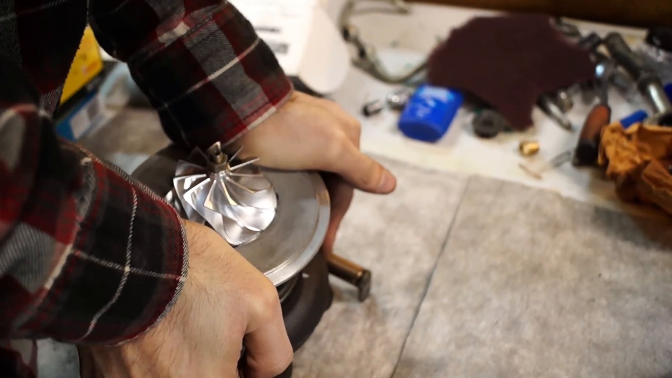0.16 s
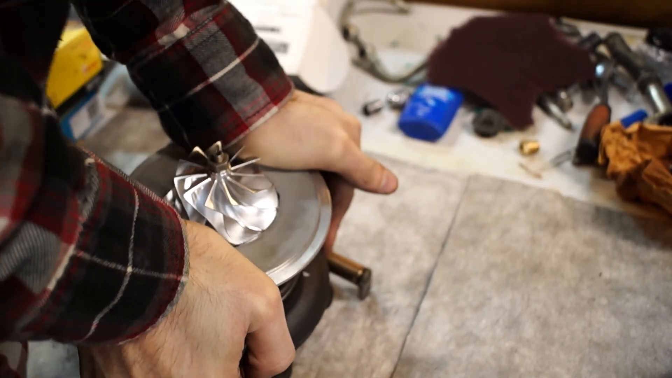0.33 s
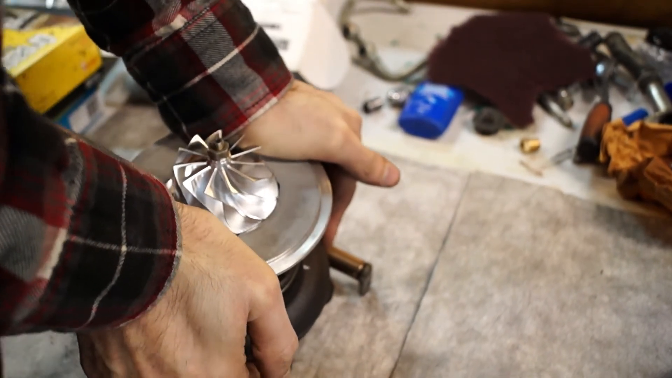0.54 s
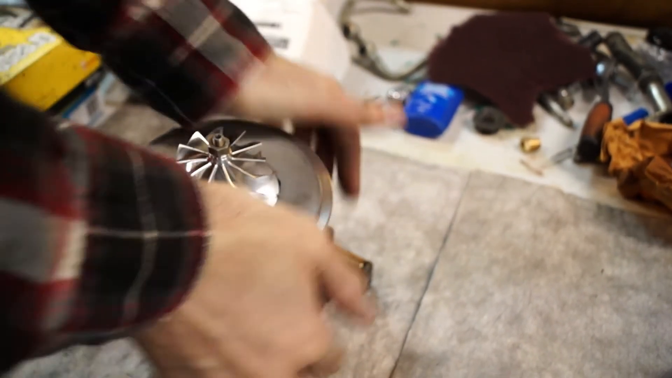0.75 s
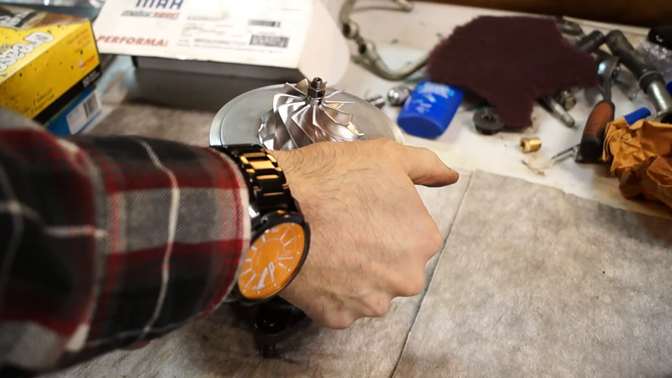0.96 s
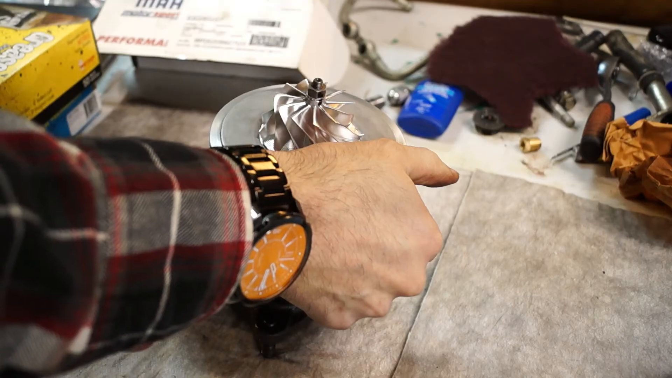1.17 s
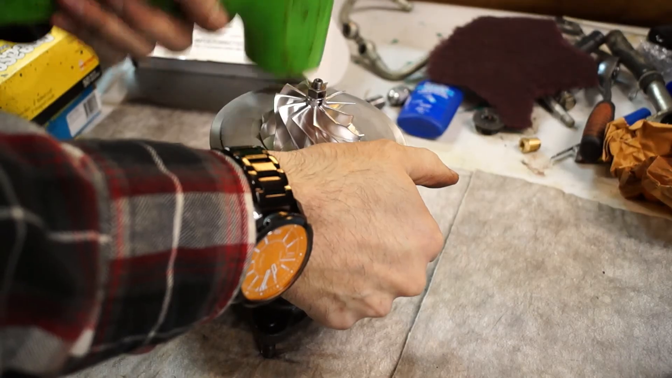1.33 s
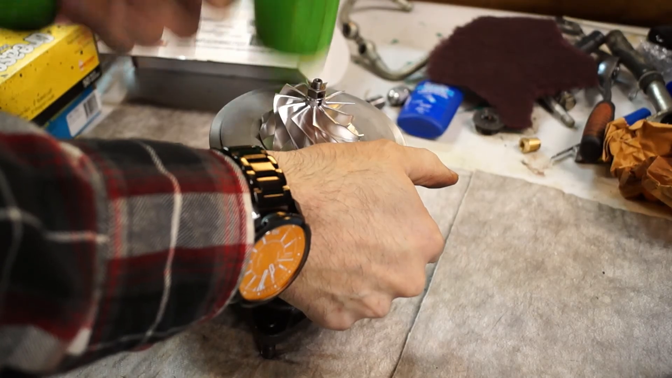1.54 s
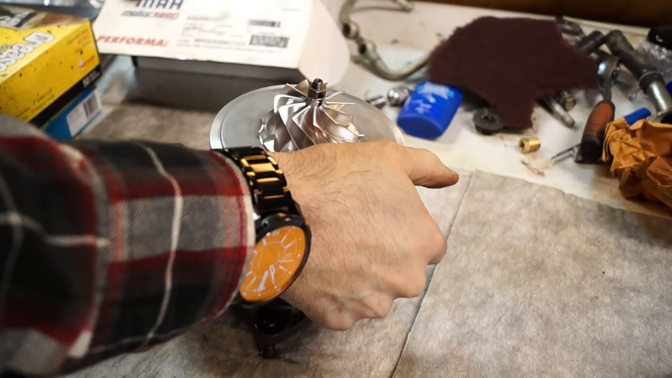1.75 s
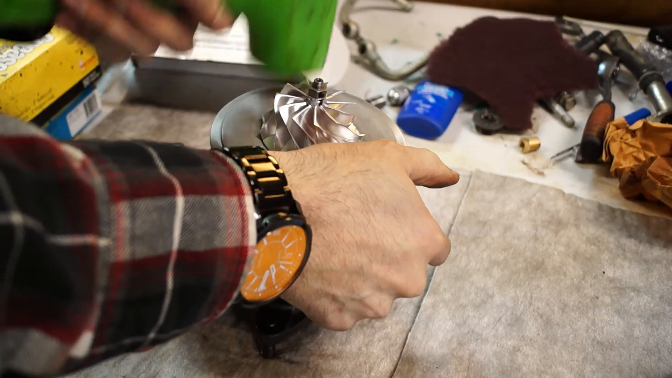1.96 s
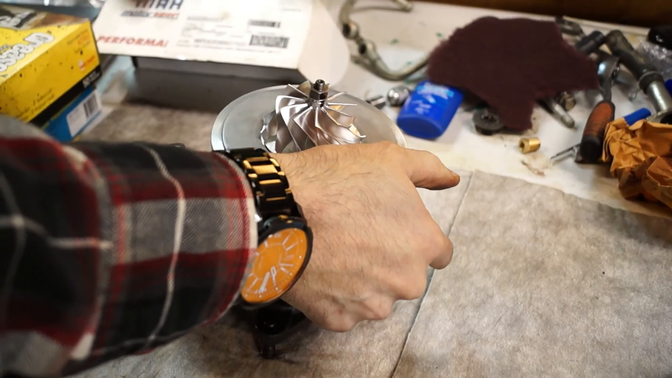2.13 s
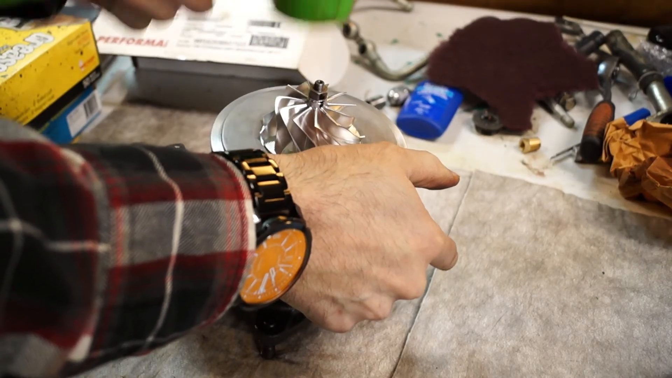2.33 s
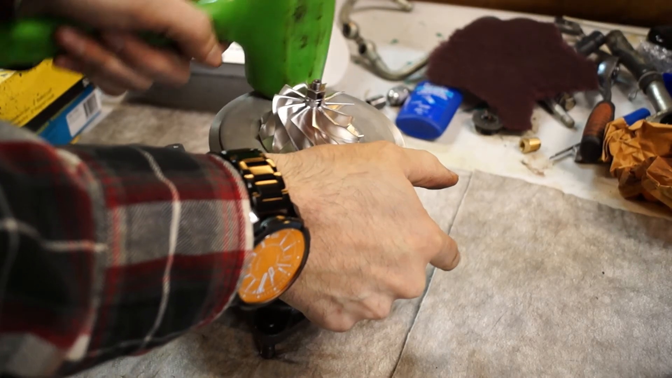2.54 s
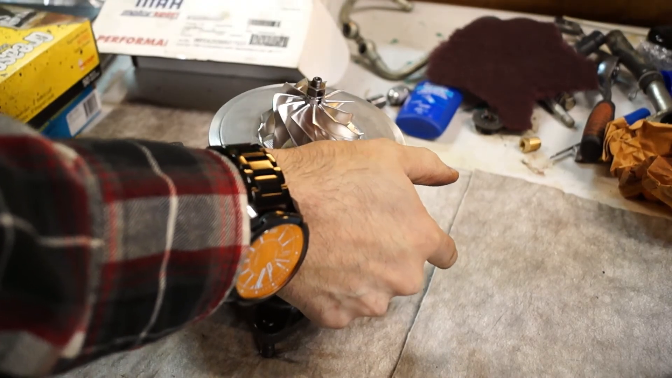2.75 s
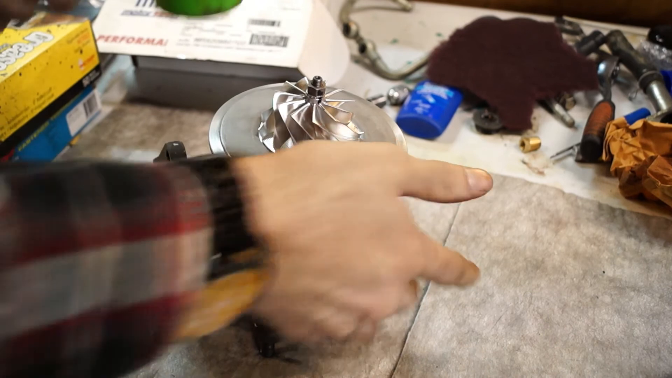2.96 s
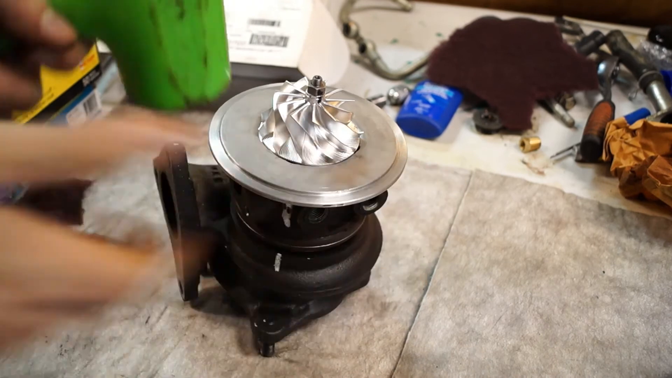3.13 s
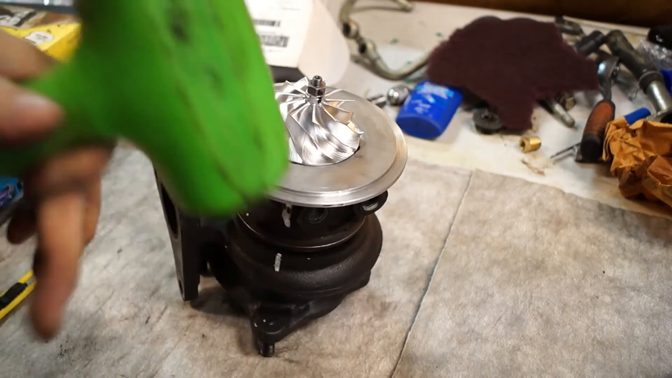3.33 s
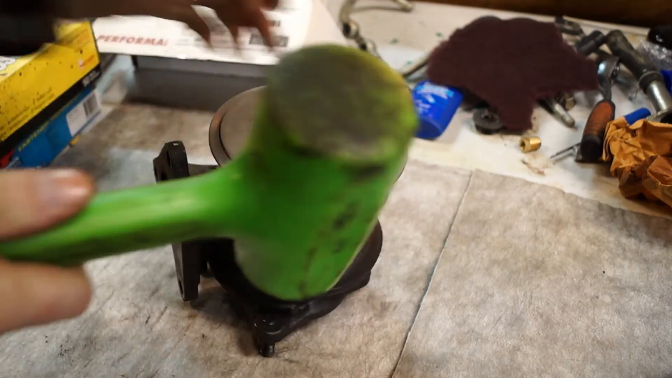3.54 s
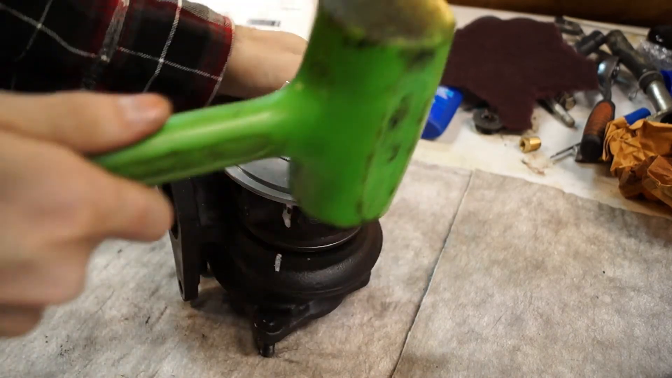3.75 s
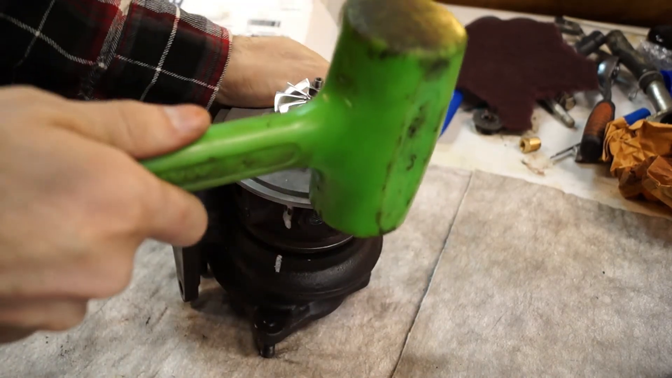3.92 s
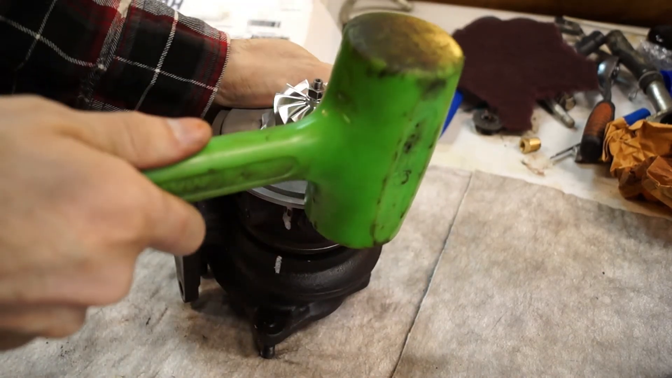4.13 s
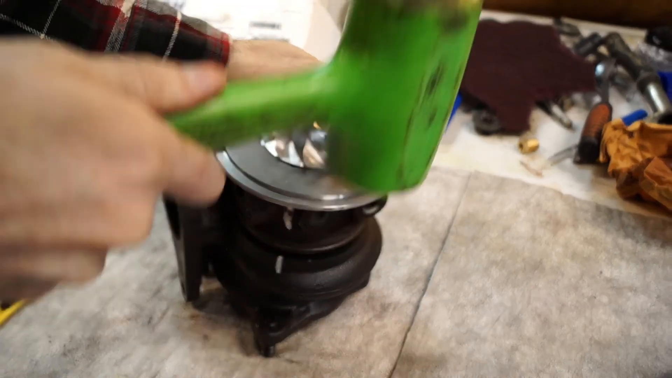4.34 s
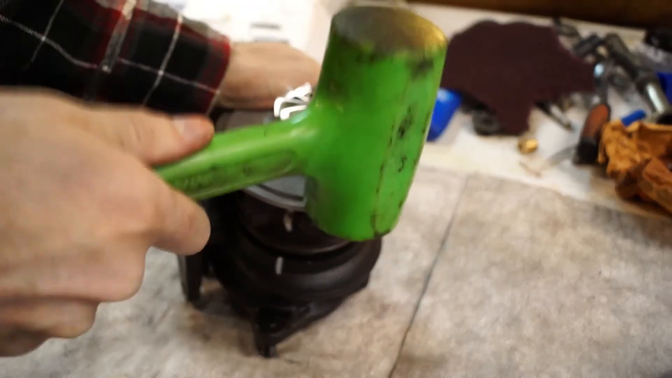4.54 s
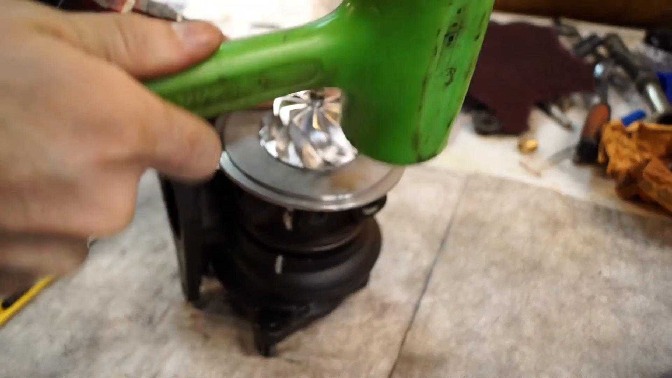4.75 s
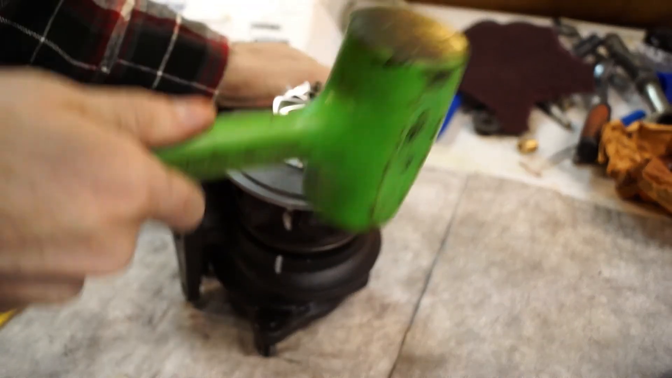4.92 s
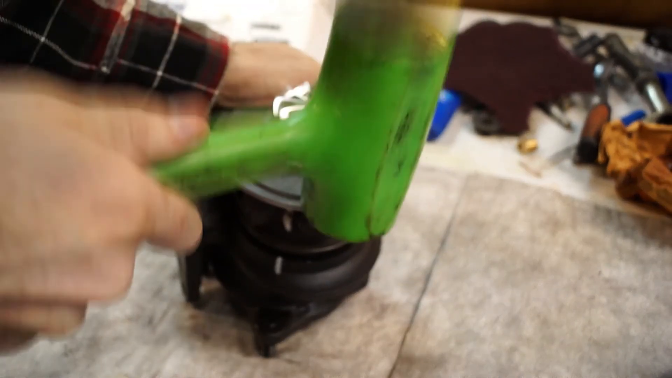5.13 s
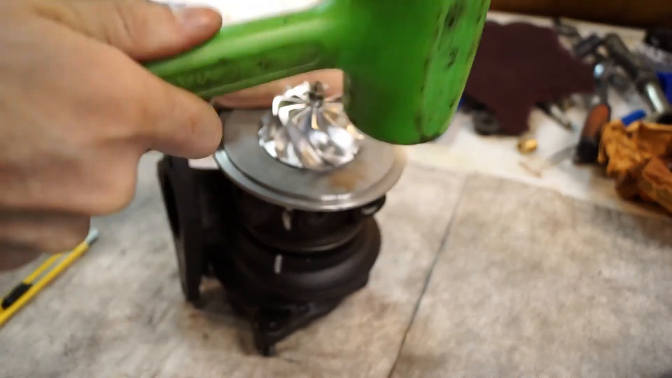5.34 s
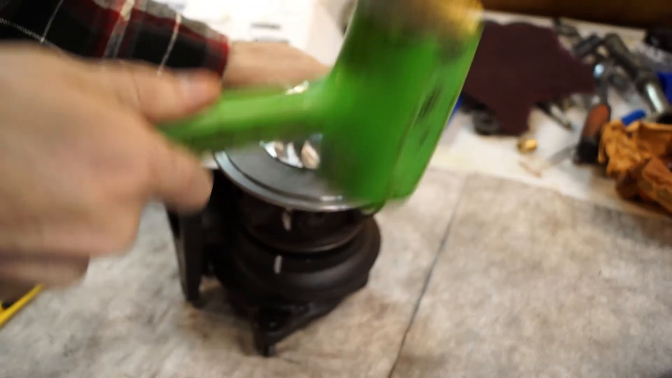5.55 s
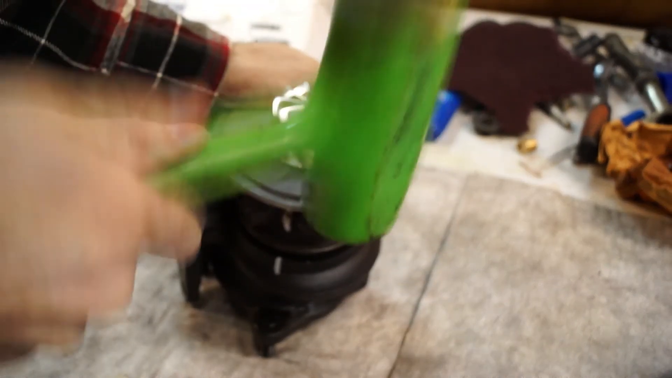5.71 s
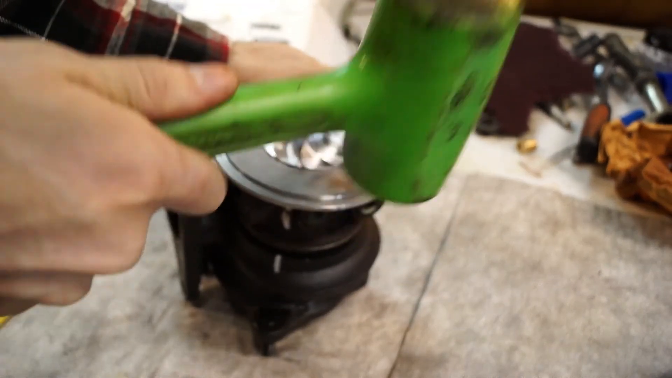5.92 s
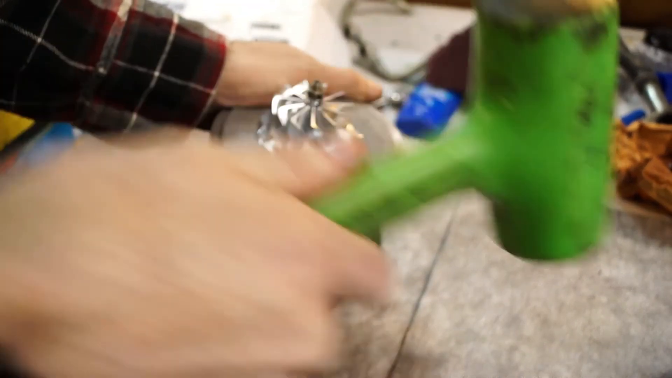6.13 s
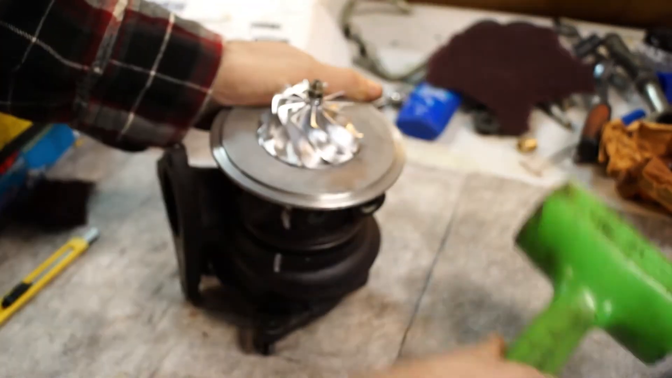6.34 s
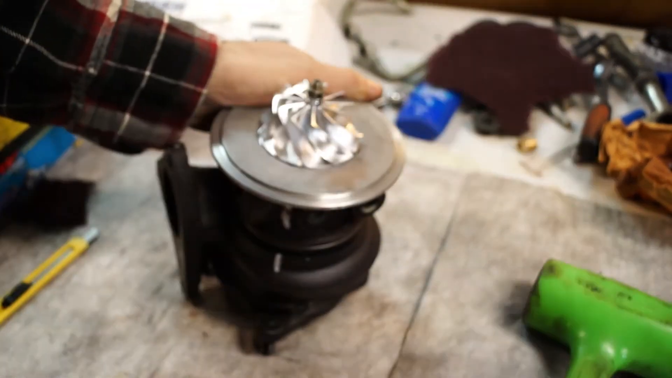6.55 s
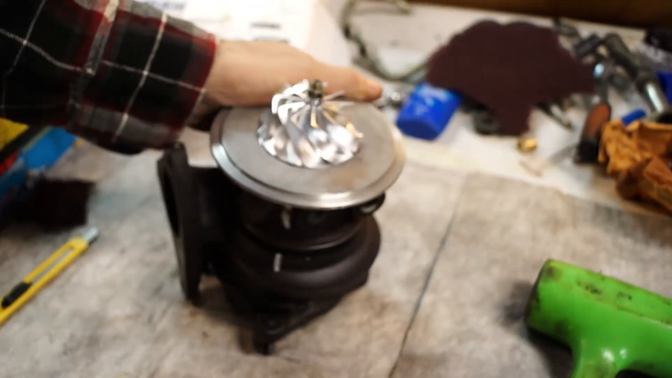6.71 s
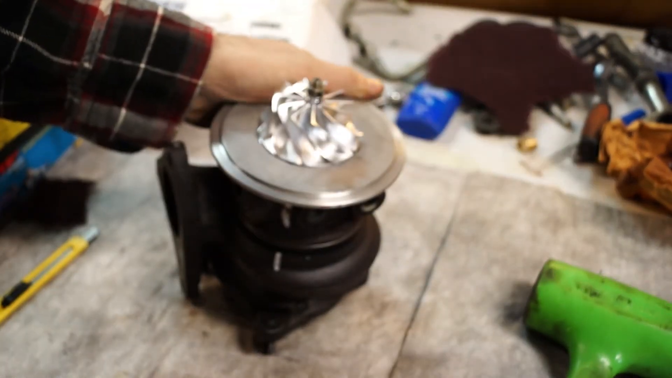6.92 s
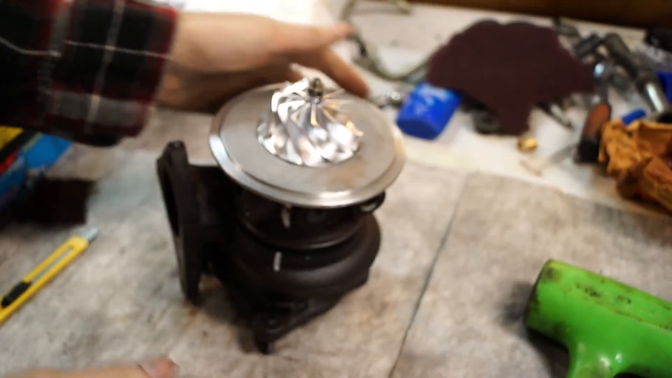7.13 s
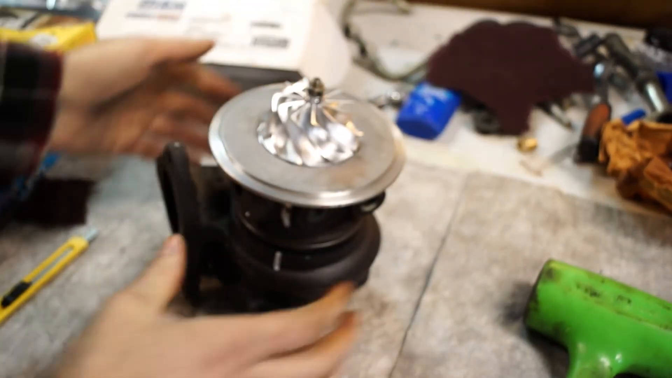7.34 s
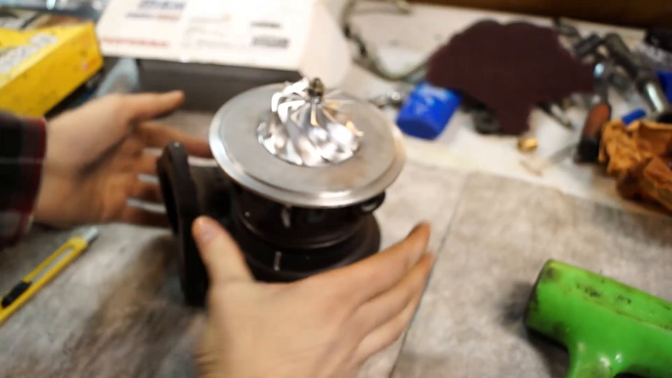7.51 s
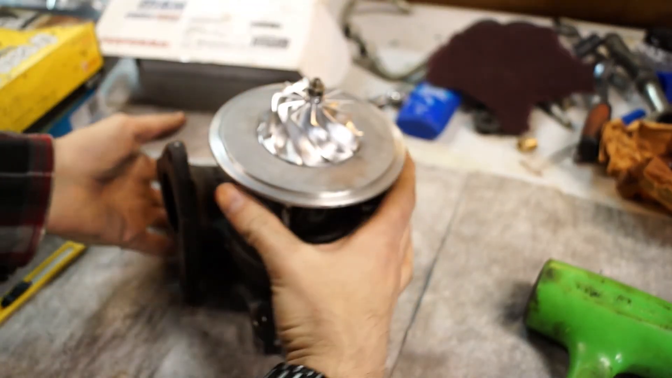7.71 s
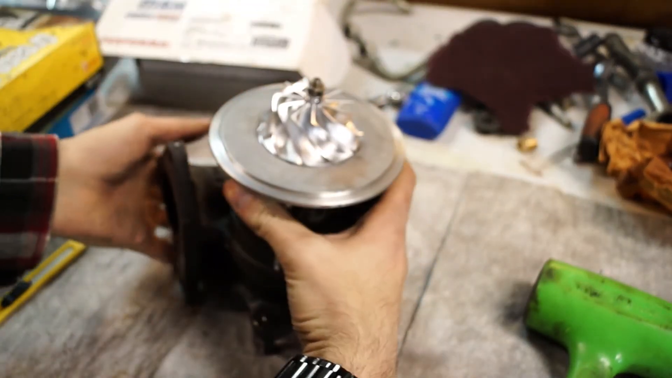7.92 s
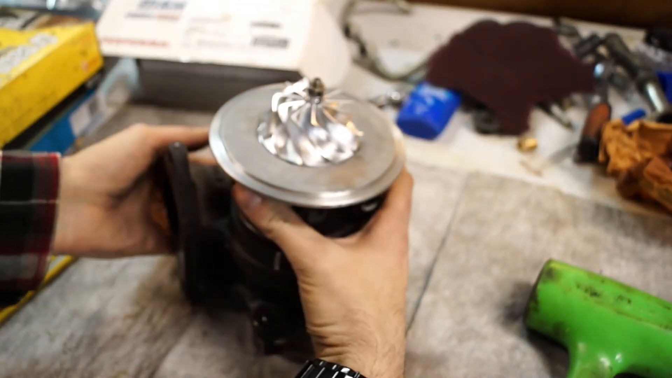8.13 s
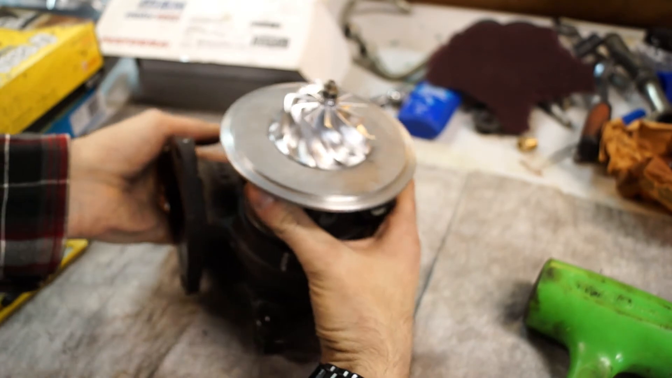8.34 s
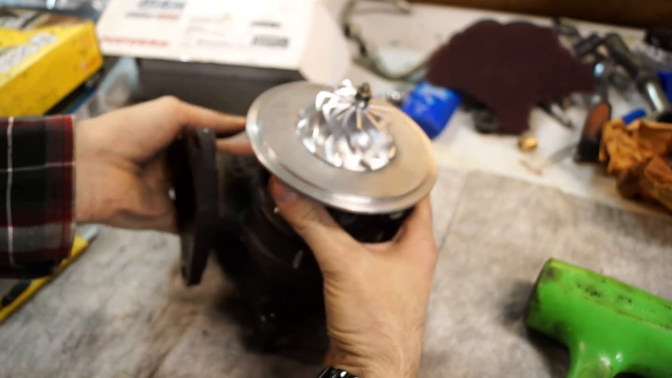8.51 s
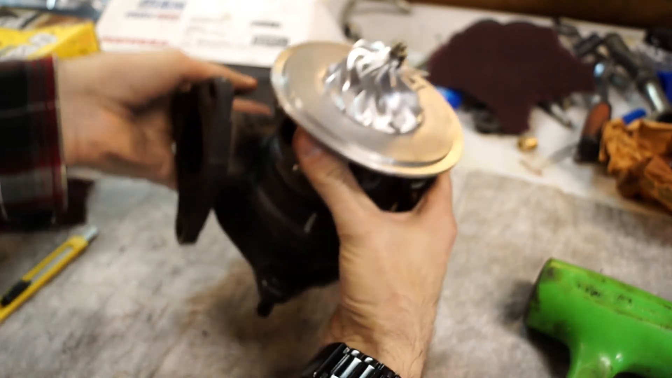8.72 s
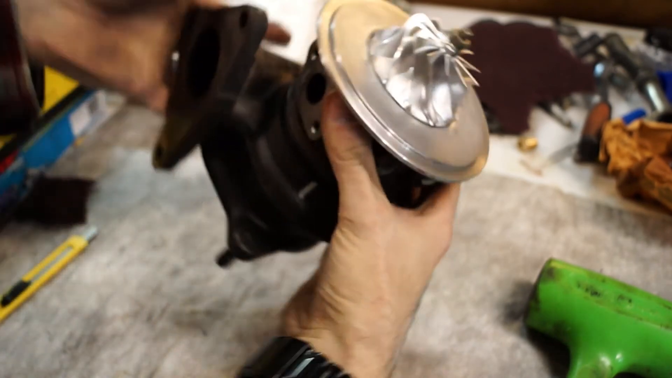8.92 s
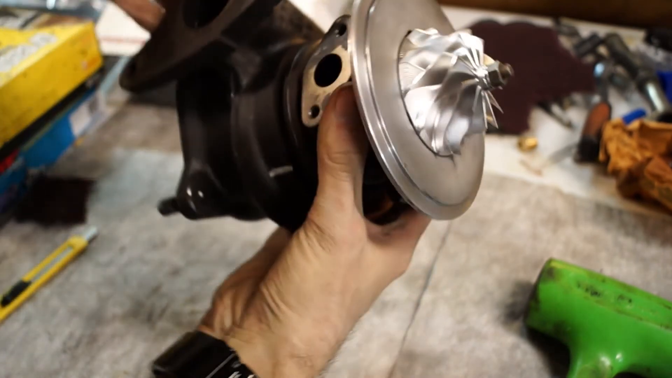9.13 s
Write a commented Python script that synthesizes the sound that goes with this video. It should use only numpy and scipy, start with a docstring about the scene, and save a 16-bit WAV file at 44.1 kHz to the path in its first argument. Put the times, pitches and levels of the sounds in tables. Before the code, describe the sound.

Close stereo pickup at a padded workbench: faint bumps and sleeve rustle, a skin-on-metal swish, then five quick solid mallet knocks with short metallic ring and room echo. A short gritty scrape, five more knocks with a stronger metal rim tone, a dull thud as the mallet is put down, cloth rustle, and finally sharp little metal clicks over low hum and soft room tone.

```python
"""A soft dead-blow mallet taps a cast metal assembly on a padded workshop bench, in two runs of five blows.
Each blow joins a soft contact, a bright crack, loose shot in the mallet head and ringing metal and bench.
A hand slides off first; the part is dragged before the second run. Then the mallet is laid down and the part
lifted with small clinks. These are shaped noise bursts and dying sines, over cloth-like noise.
Steady sines make the mains hum, with soft noise as room tone; echoes of a small hard-walled room surround the hits."""
import sys
import numpy as np
from scipy import signal
from scipy.fft import rfft, irfft
from scipy.io import wavfile
from scipy.ndimage import uniform_filter1d

SR = 44100
rng = np.random.default_rng(int(sys.argv[2]) if len(sys.argv) > 2 else 0)


def put_to_file(sound):
    """Save the sound as 16-bit audio at rate SR, in the file named by the first command-line argument."""
    columns = np.atleast_2d(sound).T  # one column per channel
    safe = np.clip(columns, -1, 1)
    whole_steps = np.round(safe * 32767)
    wavfile.write(sys.argv[1], SR, whole_steps.astype(np.int16))


def undo_db(level):
    """Turn decibels back into plain size, where 20 dB means ten times bigger."""
    steps = np.asarray(level, float) / 20
    return 10 ** steps


N = 408807  # length in samples

# Mains hum, before its drift: multiple_of_mains, level_db (rms)
HUM = [(2, -61), (4, -76.5), (6, -72), (8, -83), (10, -69), (12, -75), (14, -75), (15, -74.5), (16, -76),
       (17, -76.5), (19, -72), (21, -77), (23, -77), (29, -88), (36, -84.5), (38, -80.5)]
MAINS_HZ = 59.95
# Hum and room tone rise and sink together: time_s, gain_db
DRIFT = [(0, 4), (.885, 5), (.895, 2.5), (1.3, 2), (7, 3.5), (7.6, 5), (9.27, 5)]
# Colour of the room tone: pitch_hz, density_db (per Hz)
ROOM_TONE = [(25, -21), (84, -12.5), (130, -9), (200, -3.5), (400, -13), (700, -19.5), (1300, -18.5),
             (1600, -18), (5000, -26.5), (16000, -30.5)]
ROOM_TONE_DB = -60.5  # rms before the drift

# How long echoes take to fall by 60 dB: pitch_hz, t60_s
ROOM_DECAY = [(100, 0.44), (260, 0.52), (700, 0.51), (1840, 0.48), (4850, 0.43), (12800, 0.31)]
# How alike the echoes are left and right: pitch_hz, likeness (0 to 1)
ROOM_SAME = [(60, 0.8), (180, 0.93), (550, 0.47), (1650, 0.62), (4970, 0.6), (15000, 0.073)]
# Colour of the echoes, strongest in the bass, weakest around 1 kHz: pitch_hz, level_db
ROOM_COLOUR = [(100, 6.5), (1000, -2.5), (4000, -0.5), (9000, 1.5), (16000, -1.5)]
# Left-right balance of all hits: pitch_hz, left_minus_right_db
LEAN = [(60, -1), (180, 0.5), (550, -2), (1650, -2), (4970, -2), (15000, 1)]

# Palm sliding off the plate: time_s, level_db (rms)
SLIDE = [(0.5, -72), (0.514, -66), (0.686, -48), (0.774, -52), (0.884, -47), (0.889, -71)]
# Colour of the sliding palm: pitch_hz, density_db (per Hz)
SLIDE_TONE = [(120, -28), (200, -15), (289, 1), (366, 0), (394, -3), (601, -5.5), (1710, -19), (2290, -10),
              (2510, -14.5), (5630, -10), (7540, -15), (13800, -12.5), (16000, -25)]
# Sleeves and fingers moving: time_s, level_db (before clumping)
RUSTLE = [(0.0, -59), (0.72, -55.5), (0.88, -64), (0.9, -66), (2.7, -70), (2.9, -60.5), (3.56, -66),
          (4.13, -64), (4.28, -55), (4.45, -68), (6.07, -53.5), (6.38, -59), (6.75, -52.5), (7.0, -58.5),
          (7.33, -62), (7.67, -52), (7.82, -59), (9.27, -62)]
# Colour of the rustle: pitch_hz, density_db (per Hz)
RUSTLE_TONE = [(60, -55), (150, 1), (400, 2), (2200, -12), (5000, -13.5), (16000, -27.5)]
# Each blow shakes the pad and the litter on the bench; level against the blow, before the rise and fade
JOLT_DB, JOLT_RISE_S, JOLT_FADE_S = -17.5, 0.06, 0.046
# Dragging the part: time_s, level_db (rms), lowest_pitch_hz
DRAG = [(4.19, -49, 640), (4.226, -62, 484), (4.31, -54, 520), (4.326, -43.5, 640), (4.364, -42.5, 664),
        (4.392, -44, 640), (4.408, -45, 440), (4.44, -69, 400)]
# Higher resonances of the drag: pitch_hz, width_hz (doubled in a second pass), level_db
DRAG_RING = [(1250, 240, 0), (1980, 300, -3.5), (2420, 47, -1), (2660, 120, 1), (3430, 560, -2),
             (4290, 46, -2.5), (6700, 110, -14)]

# Loose shot rolls in the mallet head as it is laid down; level before the rise and fade
ROLL_S, ROLL_DB, ROLL_PER_S = 6.824, -24.5, 1500
ROLL_RISE_S, ROLL_FADE_S = 0.014, 0.025
# Colour of the rolling shot: pitch_hz, level_db
ROLL_TONE = [(300, 3), (670, -0.5), (1300, -5.5), (2500, -14.5), (4200, -15), (8000, -30), (16000, -40)]
# Broad clashes and brushes: start_s, level_db (peak before the room), burst_s (fade time),
# tilt_db (per octave, plus is brighter), left_minus_right_db
CLASHES = [(3.29, -52, 0.039, 2, 6), (4.168, -35, 0.0091, -8, 11), (4.1794, -26.5, 0.0028, -8.5, -5),
           (5.932, -44.5, 0.013, 0, 5), (6.049, -43.5, 0.0045, -6, 5), (8.2495, -45, 0.0056, -10.5, 0),
           (8.5392, -12, 0.0024, 5.5, 4), (9.196, -25, 0.0047, -1, 12), (9.209, -15, .006, 1, 5.5),
           (9.234, -23.5, 0.0038, 0, -7)]
# Colour of a clash or brush before its tilt: pitch_hz, density_db (per Hz)
CLASH_TONE = [(400, -26), (1200, -8.5), (3500, 2.5), (5200, -6.5), (6500, -1), (9000, -2.5), (11500, -8.5),
              (14300, -2.5), (16500, -15.5)]
# Metal touching metal: start_s, level_db (peak of the burst before the room and panning),
# pitch_hz (centre), burst_s (twice the fade time, except the very shortest), ring_db
CLINKS = [(.3588, -38, 4540, 0.0012, -26), (4.359, -37, 3500, 0.001, -30),
          (6.3903, -25.5, 2440, 0.0003, -35), (7.6459, -28.5, 2700, 0.0069, -25),
          (7.6694, -38, 2720, 0.0064, -3.5), (8.5420, -20.5, 3170, 0.0083, -18),
          (9.1612, -22, 3130, .002, -24), (9.2050, -17, 3100, 0.0014, -25),
          (9.2091, -24, 1250, 0.0036, 1.5), (9.2128, -23.5, 12100, 0.003, 3)]
CLINK_PAN_DB = 5  # left minus right: the part stands left of centre
# Soft bumps on the bench: start_s, level_db (peak before the room), contact_s, frame_db (frame against top)
THUDS = [(0.068, -31.5, 0.0028, -3), (0.098, -28, 0.0018, 0), (0.122, -31, 0.00087, 6),
         (0.147, -34.5, 0.00086, 6), (0.449, -37.5, 0.0018, 0), (4.021, -30, 0.00085, -3),
         (4.09, -41, 0.0026, -4), (6.553, -39.5, 0.004, 0), (6.8203, -12.5, 0.0031, -2),
         (6.836, -22.5, 0.0018, 0), (6.866, -24, 0.001, 10), (6.888, -30, 0.0011, 7),
         (6.918, -34, 0.0011, 8), (7.764, -42, 0.0022, -8), (8.36, -43.5, 0.0033, 5)]

# Bench tones, two of the top then two of the frame: pitch_hz, level_db, t60_s
BENCH = [(97, 0.5, 0.2), (137.4, 8.5, 0.17), (282, -5.5, 0.29), (329.2, 0, 0.25)]
# Floor tone: pitch_hz, level_db, t60_s
FLOOR = [(54.5, -10, 0.57)]
# Boards under the pad, heard in soft bumps: pitch_hz, level_db, t60_s (before extra damping)
PAD = [(478, -1, 0.097), (640, -2, 0.11)]
# Tones of the metal casting: pitch_hz, level_db, t60_s
CASTING = [(773, -9.5, 0.35), (1150, -15, 0.51), (1294, 0, 0.05), (2030, -9, .1), (2197, -1, 0.16),
           (2630, -18, .2), (3570, -34, .1), (4950, -20.5, 0.17), (7670, -25, .05)]
# Tones of the blades: pitch_hz, level_db, t60_s
BLADES = [(12100, -10, 0.25), (14100, -8.5, 0.17), (12000, -11.5, 0.13), (15500, 0, 0.078)]
# Two tones of the mallet head, then the rim under its face: pitch_hz, level_db, t60_s
HEAD = [(1142, -3, 0.0099), (8530, -7.5, 0.0042), (2183, -2, 0.014)]

# The blows: start_s, level_db, then rim_db, casting_db, lower_blade_db, upper_blade_db for the ringing
BLOWS = [(1.2417, -6, -21, -32, -46, -55), (1.5472, -6, -24, -38, -30, -50),
         (1.8430, -5.5, -19, -33, -30, -42), (2.1609, -5, -24, -34, -34, -48),
         (2.4461, -5, -21, -30, -33, -57), (4.5253, -9.5, -4, -22.5, -48, -49),
         (4.8234, -8, -6, -29, -32, -31), (5.124, -6.5, -11.5, -30, -42, -19.5),
         (5.4227, -6.5, -17, -21.5, -29, -22), (5.713, -6.5, -18, -35, -29, -52)]
# Where the blows land, far rim then near rim: start_s, hardness (stretches the contact's pitch scale),
# crack_db, floor_db, bench_top_db, bench_frame_db, mallet_head_db, shot_db (relative settings)
PLACES = [(0, 1.125, -20, -38, -19, -15.5, -6, -34), (4, 1.097, -23.5, -25, -25.5, -20.5, -0.5, -25)]
# Colour of the soft contact before hardness: pitch_hz, density_db (per Hz)
FACE = [(40, -15), (100, -45), (230, 0), (400, 2.5), (1100, 1.5), (1900, -8.5), (3000, -15), (6000, -30.5),
        (16000, -64)]
# Colour of the bright crack: pitch_hz, density_db (per Hz)
CRACK = [(1000, -53), (3000, 4), (5000, -2.5), (6500, -4), (8500, 2), (11000, -3.5), (13000, -12),
         (16000, -19)]
SHOT_S, SHOT_SPREAD_S, SHOT_HZ = 0.022, 0.0033, 5070  # centre time after the blow, spread, pitch
RIM_TO_ROOM_DB = -6.5  # share of the rim's ring that the walls return
BENCH_LAG_S = 0.001  # the bench top reaches the right channel later


def evened(x):
    """Scales a sound to an rms level of one."""
    return x / np.sqrt(np.mean(x ** 2) + 1e-20)


def read(points, hz):
    """Reads a table at any pitch, with pitch spaced roughly as we hear it."""
    f, value = np.transpose(points)
    return np.interp(np.log(hz + 1), np.log(f + 1), value)


def add(mix, s, sound):
    """Adds a sound into the mix from time s onward."""
    part = mix[..., round(s * SR):][..., :sound.shape[-1]]
    part += sound[..., :part.shape[-1]]


def curve(rows, column=1):
    """Joins a table's points into a line over the whole scene."""
    rows = np.asarray(rows)
    return np.interp(np.arange(N) / SR, rows[:, 0], rows[:, column])


def during(rows):
    """Follows a level table and is silent outside it, with soft ends."""
    t = np.arange(N) / SR
    active = 1. * (t > rows[0][0]) * (t < rows[-1][0])
    return undo_db(curve(rows)) * uniform_filter1d(active, 90)


def coloured(x, points):
    """Raises or lowers each pitch by the table's level."""
    size = x.shape[-1]
    gain = undo_db(read(points, np.fft.rfftfreq(size, 1 / SR)))
    return irfft(rfft(x) * gain, size)


def pair(size, same):
    """Two noise channels that share the given part."""
    a, b = rng.standard_normal((2, size))
    return np.array([a, same * a + np.sqrt(1 - same ** 2) * b])


def resonate(x, hz, width):
    """Passes a band around a pitch, which may move, like a body that rings there."""
    turn = np.exp(2j * np.pi * np.cumsum(hz * np.ones(x.shape[-1])) / SR)
    r = np.exp(-np.pi * width / SR)
    return 2 * (turn * signal.lfilter([1 - r], [1, -r], x / turn)).real


def ring(modes, scatter_db):
    """Dying sines, one row a tone; each contact excites them a little differently."""
    hz, db, t60 = np.transpose(modes)[:, :, None]
    t = np.arange(SR // 2) / SR
    db = db + scatter_db * rng.standard_normal(db.shape)
    return undo_db(db - 60 * t / t60) * np.sin(2 * np.pi * hz * t)


def causal(gain):
    """Makes a short pulse, early in its energy, whose gain follows a function of pitch."""
    log_gain = np.log(gain(abs(np.fft.fftfreq(8192, 1 / SR))) + 1e-5)
    pulse = np.fft.ifft(np.exp(np.conj(signal.hilbert(log_gain)))).real
    return np.pad(pulse[:2048], (0, SR // 2 - 2048))


def room(sound, wet_db):
    """Direct sound plus diffuse echoes whose bands die at their own speed; fresh echoes each time."""
    hz, t = np.fft.rfftfreq(256, 1 / SR), np.arange(500) * 64 / SR
    z = signal.stft(rng.standard_normal((2, 499 * 64)), nperseg=256, noverlap=192)[2][..., :len(t)]
    same = read(ROOM_SAME, hz)[:, None]
    z[1] = same * z[0] + np.sqrt(1 - same ** 2) * z[1]
    fall_db = 60 * t[:z.shape[-1]] / read(ROOM_DECAY, hz)[:, None]
    gain = undo_db(read(ROOM_COLOUR, hz)[:, None] - fall_db)
    tail = signal.istft(z * gain, nperseg=256, noverlap=192)[1]
    tail *= np.clip(np.arange(tail.shape[1]) / SR / 0.0045 - 0.3, 0, 1)  # echoes build up
    tail *= undo_db(wet_db) / 40
    tail[:, 0] = 1  # the direct sound
    return signal.fftconvolve(sound[None], tail, axes=1)


def background():
    """Mains hum as steady sines, its overtones unsteady, over room tone of coloured noise."""
    t, hum = np.arange(N) / SR, np.zeros((2, N))
    for order, db in HUM:
        hz = order * MAINS_HZ
        high = min(hz / 400, 1) ** 2  # overtones flutter and are out of step left and right
        waver = np.interp(t, np.arange(200) / 20, rng.standard_normal(200))
        lag = rng.random() + high * (np.array([[0], [0.22]]) + 0.03 * waver)  # in cycles
        level = np.sqrt(2) * undo_db(db + 1.2 * high * waver)
        hum += level * np.sin(2 * np.pi * (hz * t + lag))
    tone = undo_db(ROOM_TONE_DB) * evened(coloured(pair(N, 0), ROOM_TONE))
    return undo_db(curve(DRIFT)) * (hum + tone)


def rustle():
    """Clumped cloth grains, stirred by the hands and shaken up after each blow."""
    level = undo_db(curve(RUSTLE))
    t = np.arange(SR // 2) / SR
    jolt = (1 - np.exp(-t / JOLT_RISE_S)) * np.exp(-t / JOLT_FADE_S)
    for s, db, *_ in BLOWS:
        add(level, s, undo_db(db + JOLT_DB) * jolt)
    clumps = undo_db(1.15 * evened(uniform_filter1d(rng.standard_normal(N), 600)))
    return level * clumps * evened(coloured(pair(N, 0.08), RUSTLE_TONE))


def slide():
    """Fine friction of skin on machined metal, made of coloured noise."""
    return during(SLIDE) * evened(coloured(pair(N, 0.84), SLIDE_TONE))


def drag():
    """Uneven slips excite the base's resonances; the lowest wanders and ends deeper."""
    unevenness = undo_db(2.8 * evened(uniform_filter1d(rng.standard_normal(N), 90)))
    slips = pair(N, 0.28) * unevenness
    lowest_hz = curve(DRAG, column=2)
    body = undo_db(7.5) * resonate(resonate(slips, lowest_hz, 106), lowest_hz, 170)
    for hz, width, db in DRAG_RING:
        body += undo_db(db) * resonate(resonate(slips, hz, width), hz, 2 * width)
    return during(DRAG) * evened(body)


def roll():
    """A swarm of small clicks from rolling shot swells and dies away."""
    t = np.arange(8192) / SR
    clicks = rng.standard_normal(len(t)) * (rng.random(len(t)) < ROLL_PER_S / SR)
    swell = (1 - np.exp(-(t / ROLL_RISE_S) ** 2)) * np.exp(-t / ROLL_FADE_S)
    return undo_db(ROLL_DB) * evened(coloured(clicks, ROLL_TONE)) * swell


def clash(burst, tilt_db):
    """A short broad puff of noise, tilted dark or bright."""
    t = np.arange(4096) / SR
    tone = [(hz, db + tilt_db * np.log2(hz / 4000)) for hz, db in CLASH_TONE]
    puff = coloured(rng.standard_normal(len(t)), tone) * np.sqrt(t) * np.exp(-t / burst)
    return puff / abs(puff).max()


def clink(hz, burst, ring_db):
    """A short burst around its centre; all metal tones ring on, those nearest that centre most."""
    t = np.arange(SR // 2) / SR
    puff = rng.standard_normal(len(t)) * np.sqrt(t) * np.exp(-t / max(0.5 * burst, 2e-4))
    for _ in range(3):
        puff = resonate(puff, hz, min(1.1 * hz, 4000))
    metal = CASTING + BLADES
    distance = np.log(np.array(metal)[:, 0] / hz) * np.sqrt(hz) / 9
    near = np.exp(-distance ** 2) + 0.097
    return puff / abs(puff).max() + undo_db(ring_db) * near @ ring(metal, 1.3)


def thud(contact, frame_db):
    """A smooth push of the given length drives the bench, damped by the pad, and the floor."""
    t = np.arange(SR // 2) / SR
    push = np.hanning(int(contact * SR) + 3)
    # two bench top tones, two frame tones, one casting tone, two boards
    levels_db = np.array([-8, 0, *(frame_db + np.array([1, 2, -2, -0.5, -2]))])
    body = undo_db(levels_db) @ ring(BENCH + CASTING[:1] + PAD, 2.5)
    body *= np.exp(-t / 0.014) * (1 - np.exp(-t / 0.005))  # pad damping and soft start
    floor = undo_db(-21.5) * ring(FLOOR, 0.87)[0]
    bump = signal.fftconvolve(body + floor, push)
    return bump / abs(bump).max()


def bench_ring(top_db, frame_db, floor_db):
    """Bench top, frame and floor swell briefly, then die; returns the top alone and the whole."""
    levels = undo_db(np.array([top_db, top_db, frame_db, frame_db, floor_db]))
    parts = levels[:, None] * ring(BENCH + FLOOR, 0.92)
    parts *= 1 - np.exp(-np.arange(SR // 2) / SR / 0.0033)
    return parts[:2].sum(0), parts.sum(0)


def blade_ring(lower_db, upper_db):
    """The blades wake late, as the shock travels up the shaft."""
    late = 1 - np.exp(-(np.arange(SR // 2) / SR / 0.0071) ** 2)
    return undo_db(np.array([lower_db, upper_db, lower_db])) @ ring(BLADES[:3], 1) * late


def loose_shot():
    """Shot in the mallet head makes a hiss that swells and fades just after the contact."""
    t = np.arange(SR // 2) / SR
    swell = np.exp(-0.5 * ((t - SHOT_S) / SHOT_SPREAD_S) ** 2)
    return resonate(pair(len(t), 0.35), SHOT_HZ, 970) * swell


def blow(s, rim_db, casting_db, lower_db, upper_db):
    """The contact, shot and ringing metal fill the room; the knock and bench are drier."""
    place = [row[1:] for row in PLACES if row[0] <= s][-1]
    hard, crack_db, floor_db, top_db, frame_db, head_db, shot_db = place
    t = np.arange(SR // 2) / SR
    face = 16 * causal(lambda hz: np.hypot(undo_db(read(FACE, hz / hard)), undo_db(read(CRACK, hz) + crack_db)))
    top, bench = bench_ring(top_db, frame_db, floor_db)
    shot = loose_shot()
    rim = undo_db(rim_db + RIM_TO_ROOM_DB) * ring(HEAD[2:], 1)[0]
    casting = undo_db(casting_db) * ring(CASTING, 1.3).sum(0) * (1 - np.exp(-t / 0.008))
    blades = blade_ring(lower_db, upper_db)
    in_room = rim + undo_db(shot_db + 0.5) * shot[0] + face + casting + blades + 0.35 * bench
    heard = room(in_room, 4)

    knock = undo_db(np.array([head_db, head_db, rim_db])) @ ring(HEAD, 1) * (1 - np.exp(-t / 0.0005))
    add(heard, 0, knock - 0.35 * face)  # the direct contact is softened, so the knock stands out
    late_top = np.interp(t - BENCH_LAG_S, t, top)
    add(heard, 0, np.array([bench, bench + late_top - top]))
    crack = np.exp(-t / 0.0021) * coloured(pair(len(t), 0.84), CRACK)
    add(heard, 0, undo_db(crack_db + 9) * crack)
    add(heard, 0, undo_db(shot_db) * shot)
    return heard


def scene():
    """Places every hit in the room, then adds the hand sounds and the background."""
    hits = np.zeros((2, N))
    sides = np.array([[0.5], [-0.5]])  # left and right shares of a level difference
    add(hits, ROLL_S, undo_db(-4 * sides) * room(roll(), -11))
    for s, db, burst, tilt_db, pan_db in CLASHES:
        add(hits, s, undo_db(db + pan_db * sides) * room(clash(burst, tilt_db), -6.5))
    for s, db, hz, burst, ring_db in CLINKS:
        add(hits, s, undo_db(db + CLINK_PAN_DB * sides) * room(clink(hz, burst, ring_db), -7))
    for s, db, contact, frame_db in THUDS:
        add(hits, s, undo_db(db) * room(thud(contact, frame_db), -12))
    for s, db, *levels in BLOWS:
        add(hits, s, undo_db(db) * blow(s, *levels))
    left = coloured(hits[0], [(hz, 0.5 * db) for hz, db in LEAN])
    right = coloured(hits[1], [(hz, -0.5 * db) for hz, db in LEAN])
    return np.array([left, right]) + slide() + drag() + rustle() + background()


def low_pass(x):
    """Removes everything above the highest recorded frequency."""
    return signal.sosfilt(signal.butter(12, 16810, fs=SR, output="sos"), x)


def record(dry):
    """The microphones lose the deepest bass, below about 50 Hz."""
    bass_cut = signal.butter(2, 50, "high", fs=SR, output="sos")
    mix = signal.sosfilt(bass_cut, dry)
    return low_pass(mix)


dry = scene()
out = record(dry)
put_to_file(out)
```